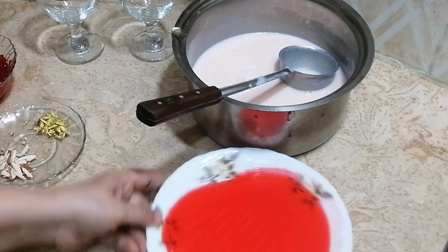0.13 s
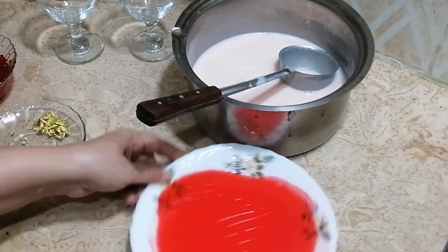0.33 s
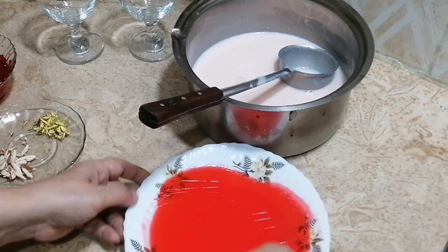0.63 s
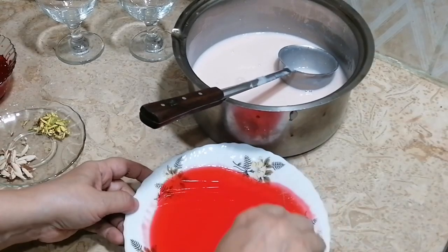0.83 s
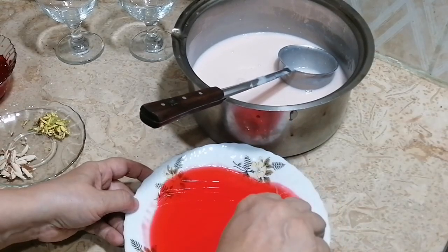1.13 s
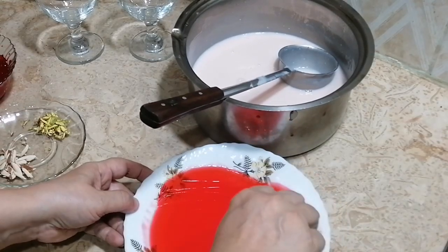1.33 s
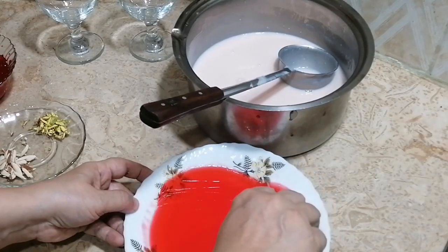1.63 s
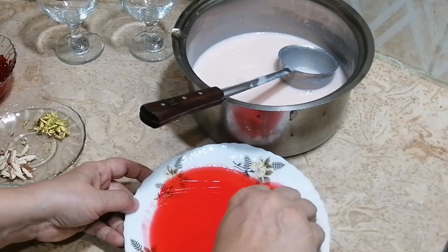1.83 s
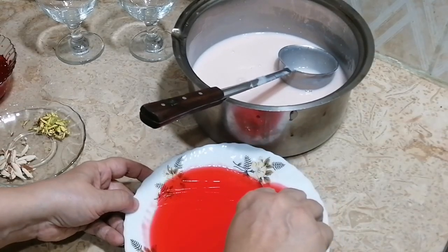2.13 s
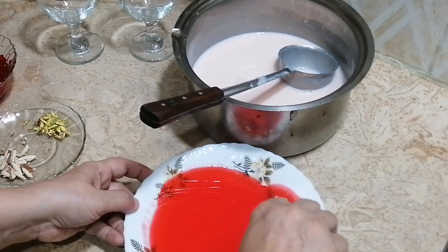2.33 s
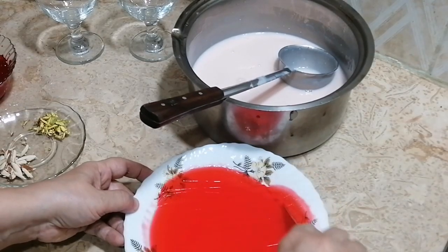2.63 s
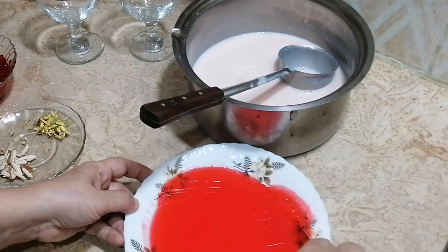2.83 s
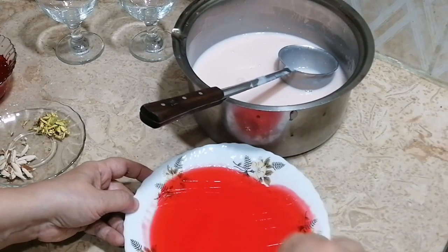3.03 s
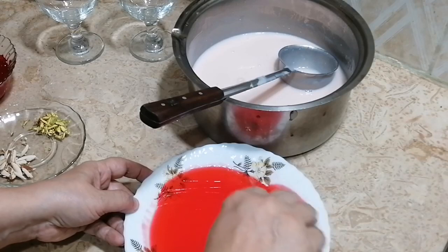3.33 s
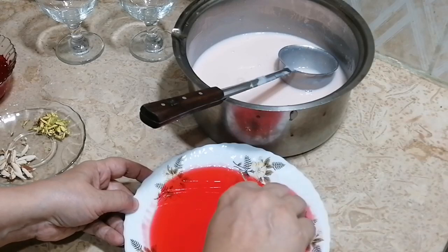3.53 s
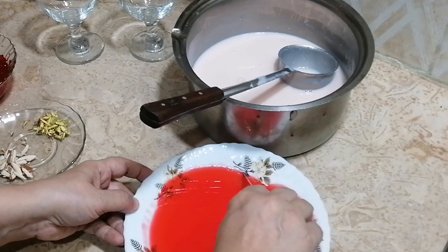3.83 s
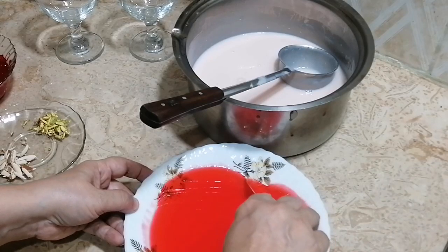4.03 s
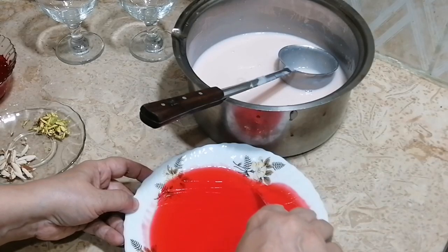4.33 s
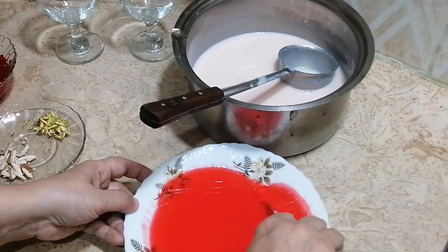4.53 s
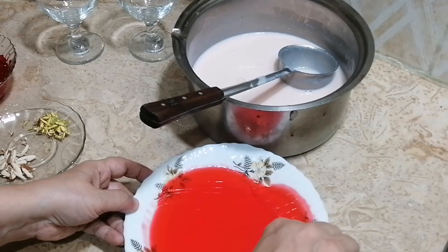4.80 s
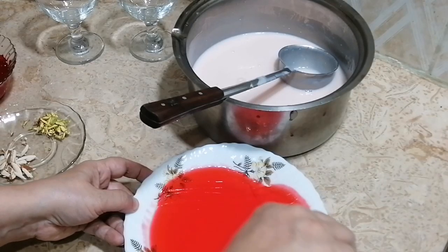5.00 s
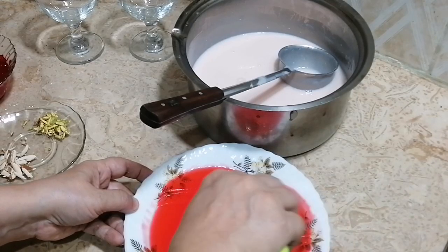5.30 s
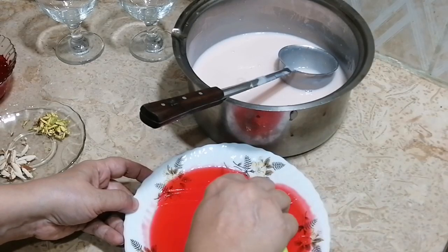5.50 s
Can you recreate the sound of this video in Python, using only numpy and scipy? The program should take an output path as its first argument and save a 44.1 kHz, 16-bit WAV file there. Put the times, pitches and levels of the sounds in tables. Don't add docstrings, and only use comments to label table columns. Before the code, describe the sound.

In a softly humming kitchen, a plate is set down with a bright ringing knock, followed by spaced bursts of sharp blade clicks on glazed ceramic.

```python
import sys
import numpy as np
from scipy import signal
from scipy.fft import rfft, irfft, next_fast_len
from scipy.io import wavfile
from scipy.ndimage import uniform_filter1d, map_coordinates

SR = 44100
rng = np.random.default_rng(int(sys.argv[2]) if len(sys.argv) > 2 else 0)


def inscribe(sig):
    pcm = np.round(np.clip(np.atleast_2d(sig).T, -1, 1) * 32767)
    wavfile.write(sys.argv[1], SR, pcm.astype(np.int16))


def makeup_ratio(level_db):
    decades = np.asarray(level_db, float) / 20
    return 10 ** decades


N = 249606
PADDED = next_fast_len(N + SR)
HZ = np.fft.rfftfreq(PADDED, 1 / SR)
RESPONSE_N, LEAD_N = 2 ** 15, 2 ** 9
RESPONSE_HZ = np.fft.rfftfreq(RESPONSE_N, 1 / SR)
TIME_S = np.arange(N) / SR
EARS = np.array([[.5], [-.5]])
MIC_PHASE_RAD = 1.34
TOUCH_S, LIFT_S, LIFT_DULL = 0.018, 0.2, 1.11
LEAN_S, EASE_S, AWAY_DB = 0.17, 0.24, 51
BRUSH_IN_S, BRUSH_OUT_S = 0.47, 0.45

# time_s, peak_db, brightness_db
DROP_BLOWS = [
    (0.5, -21.5, 5),
    (0.542, -31, 18.5),
]
# time_s, peak_db, brightness_db
NEAR_TAPS = [(3.0057, -23.5, -0.5), (3.0223, -28.5, -6), (3.053, -29, -8)]
RIM_TAPS = [(4.0566, -38, -3), (4.077, -35, -7), (4.0915, -23.5, -1.5), (4.1197, -27, -1),
            (4.157, -30.5, -2), (4.1661, -24.5, -5)]
FAR_TAPS = [(5.012, -37, -7), (5.0156, -30, -14)]
# time_s, peak_db, brightness_db
STRIKE_BLOWS = [(3.9491, -16.5, 3.5), (3.9533, -27, 10.5), (3.957, -30, -7)]
# time_s, peak_db, brightness_db
TICK_BLOWS = [(2.743, -53, 0), (2.889, -54, 0), (2.896, -54, 0), (2.903, -57, 0)]
# time_s, peak_db, brightness_db
JELLY_KNOCKS = [(2.2261, -37.5, -22), (2.484, -54, -12), (2.629, -59, -12)]
# time_s, peak_db, brightness_db
NEAR_CHATTER = [(3.063, -34, -11), (3.085, -29, -6), (3.1012, -25, -6), (3.107, -31, -4), (3.116, -29, -8),
                (3.128, -31, -3), (3.1499, -31.5, -3), (3.157, -30, -6), (3.205, -33, -9),
                (3.2363, -37, -5), (3.2578, -32, 2)]
RIM_CHATTER = [(4.174, -29, -4), (4.1943, -31, -6), (4.202, -32, -7), (4.2183, -26, -9), (4.238, -37, -5),
               (4.247, -38, -5), (4.256, -37, -5), (4.263, -35, -5), (4.2832, -28, -4), (4.298, -30, 4)]
FAR_CHATTER = [(5.084, -39, -3), (5.112, -44, -2), (5.146, -31, 8), (5.153, -30, 4), (5.167, -32, 0),
               (5.1845, -22, -3), (5.2, -23, 2), (5.21, -28, 0)]
# time_s, level_db, brightness_db
DROP_RELEASE = [(.56, -19, 0)]
RIM_RELEASE = [(4.203, -39, 0), (4.3, -33, 0)]

# touch_s, length_s, touch_force_db, lift_force_db, brightness_db
SLIDE_RUB = [(.234, .26, -45.5, -44, 2.7)]
SKID_RUB = [(0.498, 0.11, -21, -38.5, 3)]
NEAR_RUB = [(3.007, 0.011, -36.5, -42, 8.4), (3.022, .015, -42, -51, 5), (3.055, 0.035, -38, -34, 2),
            (3.1, .012, -41, -44, 3.3), (3.117, 0.018, -40.5, -44.5, 6.9), (3.15, 0.011, -35, -45.5, 3.4),
            (3.167, 0.021, -50, -49, 9.5), (3.204, 0.015, -40, -41, 1.6), (3.232, 0.024, -44.5, -41, 6.5)]
STRIKE_RUB = [(3.95, 0.049, -48, -60, 21.6), (4.01, 0.022, -55, -66, 4)]
RIM_RUB = [(4.078, 0.011, -40, -47, 2.5), (4.091, 0.014, -48, -48.5, 7.9), (4.12, .03, -55, -60, 8),
           (4.167, .015, -37, -38.5, 2.3), (4.19, 0.03, -42, -36.5, 2.5), (4.235, 0.033, -48, -49, 5),
           (4.278, 0.039, -50, -45, 6.3)]
FAR_RUB = [(5.004, .008, -44, -45, -3), (5.013, 0.026, -45, -41, 5.5), (5.082, 0.01, -44, -46, 3),
           (5.058, 0.07, -53, -40.5, 7), (5.137, 0.03, -44, -33, 2.5), (5.186, 0.025, -30, -35.5, 2)]
SOFT_RUB = [(5.44, 0.2, -60, -60.5, 2), (5.625, 0.032, -54.5, -47, -4.5)]

# freq_hz, width_hz, level_db
SLIDE_MODES = [(771, 29, 9.5), (1210, 90, 3), (1640, 180, 0), (2860, 80, -8), (4550, 35, -1),
               (5350, 150, -4), (6740, 105, -1), (7600, 64, 0.5), (9160, 130, -13)]
DROP_MODES = [(666, 190, -14), (984, 38, 0), (1143, 30, 3.5), (1922, 12, 7), (2475, 25, 0),
              (3170, 210, -6.5), (3280, 36, -10), (3690, 15, -8), (5260, 200, -6.5), (6300, 62, -28),
              (2740, 51, -3.5), (6670, 26, -16), (8370, 120, -14)]
NEAR_MODES = [(1798, 61, -1), (1250, 134, -27), (2607, 86, 4), (3080, 100, -7), (3850, 70, -9),
              (4240, 89, -17), (4260, 50, -26), (5100, 35, -6.5), (5230, 65, -6.5), (6300, 120, -11),
              (6800, 40, -5.5), (7260, 120, -12.5), (7740, 140, -13), (9150, 130, -20)]
NEAR_END_MODES = [(1836, 90, 0), (1310, 134, -12.5), (2560, 110, 3), (2806, 24, 1.5), (3825, 70, -7.5),
                  (4300, 110, -12.5), (5010, 48, -4), (5400, 30, -2), (5330, 61, -4.5), (6200, 120, -9),
                  (6456, 50, -8), (7160, 110, -10), (7740, 140, -10.5), (9060, 82, -26)]
STRIKE_MODES = [(664, 27, -19), (1340, 24, -35), (1665, 29, 0), (1970, 23, 6), (2200, 62, -9.5),
                (2670, 74, -12), (3827, 30, -12.5), (5120, 82, -18.5), (6060, 99, -26), (6416, 32, -16),
                (7500, 18, -15), (7920, 30, -22), (7750, 29, -31), (8650, 19, -29)]
RIM_MODES = [(640, 17, -12), (1640, 57, 2), (1923, 140, -0.5), (2100, 5.8, -7.5), (3800, 34, -23),
             (5160, 120, -19), (5480, 81, -18.5), (6250, 31, -21), (6360, 120, -19), (7340, 32, -16),
             (7830, 30, -21), (8230, 71, -20.5)]
FAR_MODES = [(1540, 18, -10), (1850, 150, -2.5), (2546, 155, 5), (3860, 44, -6), (1210, 60, -19),
             (4600, 89, -24), (5020, 45, -5), (5230, 30, -7), (6510, 64, -2.5), (7360, 50, -4),
             (8150, 76, -13), (9300, 210, -32), (10000, 220, -26)]
# freq_hz, width_hz, level_db
BITE_MODES = [(1830, 90, 0.5), (2370, 33, -6.5), (2830, 76, -2), (3910, 56, -2.5), (4160, 19, -7),
              (4540, 58, -4), (5010, 42, 2), (5310, 53, 2.5), (6360, 30, 3), (7850, 36, -6.5),
              (8300, 45, -25), (9560, 25, -12)]
# freq_hz, width_hz, level_db
LIFT_MODES = [(1770, 51, -8), (2290, 57, -1), (3820, 39, 5), (4400, 23, -10), (4500, 30, -12),
              (4930, 37, 3), (5630, 36, -10), (6374, 58, 7.5), (7640, 51, -1), (9430, 28, -12),
              (10500, 230, -30)]
# freq_hz, width_hz, level_db
MUFFLED_MODES = [(1420, 55, -7), (1676, 35, 1.5), (2030, 44, -4)]
# freq_hz, width_hz, level_db
DROP_RING_MODES = [(984, 5.5, 2), (1132, 7, -1), (1886, 6.5, 1), (2022, 6, -2), (3090, 11, -5),
                   (2435, 10, -5)]
RIM_RING_MODES = [(1686, 36, -1), (1160, 24, -14), (2200, 370, -11)]
FAR_RING_MODES = [(3840, 12, -14), (5100, 17, 4), (6560, 15, -1)]

# freq_hz, density_db_per_hz
SLIDE_BED = [(240, -15), (400, -3), (527, -15), (738, -7.5), (2220, -15.5), (2840, -19), (3910, -24),
             (5230, -6), (6090, -18), (7440, -12), (15500, -32.5)]
DROP_BED = [(110, -64), (180, -21.5), (277, -10.5), (658, -8), (871, -19), (1150, -7.5), (1470, -13.5),
            (1920, -7.5), (2560, -19), (3200, -4.5), (4250, -16.5), (7140, -8), (14800, -30), (16000, -21)]
NEAR_BED_DB = [(130, -66.5), (220, -2.5), (600, -13), (1000, -27), (1770, -16), (2000, -15), (2450, -7),
               (3900, -19), (5230, -8.5), (6590, -19.5), (11000, -26.5), (14500, -36.5), (15500, -45)]
STRIKE_BED = [(260, -55), (450, -25), (1000, -24), (1630, 3), (1780, -12), (1920, -11), (3040, -26),
              (3740, -36), (7610, -28), (15500, -46.5)]
RIM_BED_DB = [(260, -53), (450, -27), (633, -7), (1020, -34.5), (1180, -7), (1660, -4), (2950, -21),
              (4340, -34), (5260, -30), (7610, -22.5), (15500, -48)]
FAR_BED_DB = [(350, -58), (600, -21), (1030, -26), (1250, -10.5), (2070, -8), (2570, -4), (3240, -11.5),
              (5150, -14.5), (7540, -16), (14900, -29), (15500, -43)]
SOFT_BED_DB = [(530, -30), (900, -10), (1030, -38), (1330, -9), (2470, 1), (3890, -10.5), (7290, -8),
               (12000, -23), (15600, -59), (22000, -120)]
# freq_hz, left_minus_right_db
PLATE_LEAN = [(60, 0), (180, -1), (550, 2.5), (1650, 1), (3500, -1.5), (5500, -3), (8500, 0.5), (13000, -1)]

# freq_hz, width_hz
COUNTER_MODES = [(99, 13), (132, 7), (156, 23.4)]
COUNTER_IDLE_DB = [-65.5, -69, -68.5]
# start_s, length_s, level_db, centre_hz
PUSHES = [(0.312, 0.058, -61, 99), (0.864, 0.089, -48, 110.4), (1.044, 0.032, -56, 132),
          (1.733, 0.25, -60.5, 132), (2.282, 0.04, -60, 99), (3.05, 0.028, -30.5, 160),
          (3.14, 0.03, -47, 160), (3.23, 0.046, -37, 152), (3.37, 0.086, -43, 152),
          (3.903, 0.13, -45.5, 143.3), (4.107, 0.056, -45.5, 132), (4.258, 0.093, -55, 130),
          (4.417, 0.07, -46.5, 120), (4.526, 0.19, -51, 132), (4.853, 0.063, -47, 120),
          (5.33, 0.058, -53, 117.4), (5.546, 0.076, -58, 132)]
# time_s, pitch_hz, level_db
BLADE_SQUEAK = [(2.05, 5250, -84), (2.22, 5230, -83), (2.28, 5800, -79), (2.34, 6180, -83),
                (2.41, 5920, -73), (2.455, 5860, -71), (2.5, 4600, -82)]
# start_s, length_s, pitch_hz, level_db
GLASS_TONES = [(.1, 0.14, 3450, -84), (1.1, 0.055, 772, -68), (2.9, .07, 5010, -83),
               (4.34, 0.049, 3500, -74), (4.44, .11, 3500, -76)]
# start_s, length_s, hollow_db, rustle_db
BRUSHES = [
    (0.954, 0.13, -65, -63),
    (4.743, 0.082, -92, -58.5),
]
CUPPED_HZ = [1256, 1390]
# freq_hz, density_db_per_hz
HUM_SPECTRUM = [(28, -52), (48, -7), (64, -40), (82, -10.5), (136, -2), (171, -4.5), (194, -9.5), (241, -4),
                (323, -4), (371, -15), (411, -6.5), (443, -12.5), (633, -14), (747, -17.5), (1000, -20),
                (1300, -54), (2200, -120)]
# freq_hz, density_db_per_hz
AIR_SPECTRUM = [(590, -34), (1000, -0.5), (1200, -0.5), (1520, -3), (1630, -1), (2390, -6.5), (3140, -6),
                (3810, -13.5), (4260, -14.5), (5050, -8.5), (6340, -8.5), (7020, -5), (10100, -15.5),
                (15000, -18.5)]
# freq_hz, correlation_ratio
EAR_LIKENESS = [(60, 0.64), (150, 1), (380, 0.76), (950, 0.16), (2380, 0.02), (5980, -0.16),
                (15000, -0.022)]
# freq_hz, left_minus_right_db
EAR_TILT = [(60, -9), (150, 1.3), (380, -0.5), (950, -0.5), (2380, 0), (5980, -2.5), (15000, 2)]
# freq_hz, t60_s
ROOM_DECAY = [(300, 0.3), (2000, 0.24), (6000, 0.23), (12000, 0.086)]


def unit(x):
    return x / np.sqrt(np.mean(np.abs(x) ** 2) + 1e-30)


def along(points, hz=HZ):
    f, v = np.transpose(points)
    return np.interp(np.log(hz + 1), np.log(f + 1), v)


def curves(rows, outside=-120):
    s, *cols = np.transpose(rows)
    return [np.interp(TIME_S, s, c, outside, outside) for c in cols]


def wobble(rate_hz):
    return map_coordinates(rng.standard_normal(int(N * rate_hz / SR) + 4), [np.arange(N) * rate_hz / SR])


def swell(s, length, db, end_db, attack, release):
    knots_s = np.cumsum([s - attack, attack, length, release])
    return np.interp(TIME_S, knots_s, [db - 60, db, end_db, end_db - 60], -200, -200)


def filtered(x, response):
    return irfft(rfft(x, PADDED) * response, PADDED)[..., :N]


def mode(hz, width, turn=0, f=HZ):
    return width * (1j * f * np.cos(turn) + hz * np.sin(turn)) / (hz * hz - f * f + 1j * f * width)


def causal(db):
    cepstrum = irfft(np.log(makeup_ratio(db) + 1e-6), RESPONSE_N)
    cepstrum[1:RESPONSE_N // 2] *= 2
    cepstrum[RESPONSE_N // 2 + 1:] = 0
    return np.exp(rfft(cepstrum))


def tail(t60s, seconds):
    hz, t, z = signal.stft(rng.standard_normal((2, int(SR * seconds))), SR, nperseg=128)
    decay = makeup_ratio(-60 * t / along(t60s, hz)[:, None])
    x = signal.istft(z * decay, SR, nperseg=128)[1]
    return rfft(x / np.linalg.norm(x[0]), RESPONSE_N)


def pair(spectrum_db):
    turn = np.arccos(np.clip(along(EAR_LIKENESS), -1, 1)) / 2
    mid, side = filtered(rng.standard_normal((2, N)), makeup_ratio(spectrum_db) * [np.cos(turn), np.sin(turn)])
    return unit(filtered(np.array([mid + side, mid - side]), makeup_ratio(EARS * along(EAR_TILT))))


def kitchen():
    hum_db = along([(18, -3.5), (33, -5.5)] + HUM_SPECTRUM[1:])
    hum = pair(np.where(HZ < 1000, hum_db, -120)) * makeup_ratio(-54 + 0.24 * wobble(3.7))
    air = pair(np.where(HZ >= 1000, along(AIR_SPECTRUM), -120)) * makeup_ratio(-64.5 + 0.7 * wobble(2.5))
    hiss = unit(filtered(rng.standard_normal((2, N)), mode(7140, 280) ** 2)) * makeup_ratio(-76.0)
    return hum + air + hiss


def brush():
    out = 0
    for s, length, hollow_db, rustle_db in BRUSHES:
        sweep = makeup_ratio(swell(s, length, 0, 0, BRUSH_IN_S, BRUSH_OUT_S))
        breeze = rng.standard_normal((2, N)) * makeup_ratio(1.2 * wobble(38.5))
        glide = np.pi / 2 * np.clip((TIME_S - s) / length, 0, 1)
        low, high = (unit(filtered(breeze, mode(hz, 180) ** 2)) for hz in CUPPED_HZ)
        hollow = np.cos(glide) * low + np.sin(glide) * high
        rustle = pair(along([(1500, -4), (3000, -6.5), (9000, -6.5), (15000, -33)]))
        out = out + sweep * (makeup_ratio(hollow_db + 5.5) * hollow + makeup_ratio(rustle_db - 4.0) * rustle)
    return out


def squeak():
    out = 0
    tones = [(*curves(BLADE_SQUEAK), .012, 5)]
    for s, length, hz, db in GLASS_TONES:
        tones.append((hz, swell(s, length, db, db, .05, .05), .004, 4))
    for hz, db, flutter, lift_db in tones:
        phase = 2 * np.pi * np.cumsum(hz * (1 + flutter * wobble(250))) / SR
        level = np.sqrt(2) * makeup_ratio(db + lift_db + 3.4 * wobble(60))
        out = out + level * np.sin(phase + 1.47 * EARS)
    return out


def counter():
    lumps = makeup_ratio(4.3 * wobble(35))
    pushes = [(makeup_ratio(swell(s, length, db, db, LEAN_S, EASE_S)), centre) for s, length, db, centre in PUSHES]
    modes = []
    for (hz, width), idle_db in zip(COUNTER_MODES, COUNTER_IDLE_DB):
        shake = filtered(rng.standard_normal((2, N)) * lumps, mode(hz, width) ** 2)
        envelope = abs(signal.hilbert(shake, PADDED)[:, :N])
        shake = unit(shake / envelope ** 0.61)
        push = sum(p * makeup_ratio(-AWAY_DB * abs(np.log2(hz / centre))) for p, centre in pushes)
        modes.append(shake * (makeup_ratio(idle_db) + push))
    mid, side = sum(modes) * makeup_ratio([[0], [-12]])
    return np.array([mid + side, mid - side]) * makeup_ratio(-2.4 * EARS)


def plate(modes, bed, bed_db, wet_db):
    ring = 0
    for hz, width, db in modes:
        turn = rng.uniform(0, 2 * np.pi)
        turns = np.array([[turn], [turn + MIC_PHASE_RAD * rng.choice([-1, 1])]])
        skirt = mode(hz, 0.46 * hz, 0, RESPONSE_HZ)
        ring = ring + makeup_ratio(db) * mode(hz, width, turns, RESPONSE_HZ) * skirt
    dense = causal(along(bed, RESPONSE_HZ) + bed_db) * tail([(500, 0.053), (9000, 0.026)], .15)
    delay = np.exp(-2j * np.pi * RESPONSE_HZ * .006)
    left, right = (ring + dense) * (1 + makeup_ratio(wet_db) * tail(ROOM_DECAY, .5) * delay)
    alike = np.clip(along(EAR_LIKENESS, RESPONSE_HZ), 0, 1)
    both = np.array([left, alike * left + np.sqrt(1 - alike ** 2) * right])
    both = both * makeup_ratio(EARS * along(PLATE_LEAN, RESPONSE_HZ))
    return np.roll(irfft(both, RESPONSE_N), LEAD_N, axis=1)


def contact(rub, taps, bodies, grain_db, tap_db, touch=TOUCH_S):
    grit = unit(rng.standard_normal(N) * makeup_ratio(grain_db * wobble(300) + 1.1 * wobble(45)))
    force, hard = np.zeros((2, N))
    for s, length, db, end_db, edge_db in rub:
        force += grit * makeup_ratio(swell(s, length, db, end_db, touch, LIFT_S))
        hard += grit * makeup_ratio(edge_db + swell(s, length, db, end_db, touch, LIFT_S / LIFT_DULL))
    for s, db, edge_db in taps:
        force[round(s * SR)] += makeup_ratio(db + tap_db)
        hard[round(s * SR)] += makeup_ratio(db + tap_db + edge_db)
    low = 1 / (1 + (HZ / 3400) ** 6)
    drive = filtered(force, low) + filtered(hard, 1 - low)
    travel_s = [rub[0][0], rub[-1][0] + rub[-1][1] + LIFT_S / 3]
    place = np.interp(TIME_S, travel_s, [0, len(bodies) - 1])
    answers = [plate(*body) for body in bodies]
    scale = np.sqrt(np.mean(np.sum(np.square(answers), axis=2)))
    out = np.zeros((2, N + RESPONSE_N))
    for k, answer in enumerate(answers):
        near = np.flatnonzero(abs(place - k) < 1)
        share = np.cos(np.pi / 2 * (place[near] - k))
        heard = signal.oaconvolve((drive[near] * share)[None], answer / scale, axes=1)
        out[:, near[0]:near[-1] + RESPONSE_N] += heard
    return out[:, LEAD_N:LEAD_N + N]


def plate_set_down():
    silent = [(0, 1, -120, -120, 0)]
    slid = (SLIDE_MODES, SLIDE_BED, 0, -11.5)
    dropped = (DROP_MODES, DROP_BED, -4, -4)
    return (contact(SLIDE_RUB, [(.39, -29, 8.7)], [slid] * 3, 1.8, 0)
            + contact(SKID_RUB, DROP_BLOWS, [dropped] * 3, 3.0, 19.8)
            + contact(silent, DROP_RELEASE, [(DROP_RING_MODES, DROP_BED, -40, -12)], 0, 20.3))


def knife():
    silent = [(0, 1, -120, -120, 0)]
    held_modes = NEAR_MODES[2:] + [(3010, 120, -2.0)]
    held = (held_modes, NEAR_BED_DB, -6, -9)
    near = (NEAR_MODES, NEAR_BED_DB, -3, -9)
    near_end = (NEAR_END_MODES, NEAR_BED_DB, -3, -9)
    struck = (STRIKE_MODES + RIM_RING_MODES[1:2], STRIKE_BED, -3.0, -8.5)
    rim = (RIM_MODES + RIM_RING_MODES[1:], RIM_BED_DB, -5.5, -11)
    freed = (RIM_MODES + RIM_RING_MODES, RIM_BED_DB, -6.5, -11)
    far = (FAR_MODES, FAR_BED_DB, -4, -9)
    bite = (BITE_MODES, FAR_BED_DB, -8, -9)
    lift = (LIFT_MODES + FAR_RING_MODES, FAR_BED_DB, -2.5, -9)
    soft = ([(2420, 440, -19)], SOFT_BED_DB, 0, -5.0)
    muffled = (MUFFLED_MODES, STRIKE_BED, -13, -8)
    tick_bed = [(4000, -9), (5000, -11), (11000, -8.0), (15000, -24)]
    tick = ([(5430, 47, 1), (10350, 130, -14)], tick_bed, -3, -3)
    rim_ring = ([(1680, 4.9, 0)], RIM_BED_DB, -40, -12)
    return (contact([(2.226, 0.036, -73, -63, -12)], JELLY_KNOCKS, [muffled], 2.5, 21.0)
            + contact(silent, TICK_BLOWS, [tick], 0, 21.7)
            + contact(NEAR_RUB, NEAR_TAPS + NEAR_CHATTER, [held, near, near, near_end], 2.1, 18.0)
            + contact(STRIKE_RUB, STRIKE_BLOWS, [struck] * 2, 6.1, 19.3)
            + contact(RIM_RUB, RIM_TAPS + RIM_CHATTER, [rim, freed, freed, freed], 1.9, 18.0)
            + contact(silent, RIM_RELEASE, [rim_ring], 0, 20)
            + contact(FAR_RUB, FAR_TAPS + FAR_CHATTER, [far, far, far, bite, lift], 0.67, 14.0)
            + contact(SOFT_RUB, [], [soft] * 3, 1.7, 0, touch=0.26))


def scene():
    return kitchen() + brush() + squeak() + counter() + plate_set_down() + knife()


def starved(x):
    loud_db, masked_db, starve_hz, roof_hz, spared = -55, -30, 8400, 15100, .25
    hz, _, z = signal.stft(x, SR, nperseg=1024)
    power = uniform_filter1d(np.mean(abs(z) ** 2, axis=0), size=3, axis=1) * 4 / 3
    total = power[hz > 900].sum(axis=0)
    band = (hz // 520).astype(int)
    band_power = np.array([power[band == b].sum(axis=0) for b in range(band[-1] + 1)])
    weak = band_power < total * makeup_ratio(2 * masked_db)
    turns = unit(uniform_filter1d(rng.standard_normal(weak.shape), size=9, axis=1)) > spared
    lost = turns[band] | (hz > roof_hz)[:, None]
    drop = (total > makeup_ratio(2 * loud_db)) & weak[band] & (hz > starve_hz)[:, None] & lost
    return signal.istft(z * ~drop, SR, nperseg=1024)[1][:, :N]


def low_pass(x):
    return signal.sosfilt(signal.butter(12, 15800, fs=SR, output="sos"), x)


def record(dry):
    turn = 2 * np.pi * np.arange(N) / 2048
    ripple = makeup_ratio(-50.5) * (np.sin(turn) + 0.036 * np.sin(2 * turn) + 0.1 * np.sin(3 * turn))
    top_db = along([(14600, -0.94), (15300, 4.0)])
    kept = filtered(dry, makeup_ratio(top_db) * np.where(HZ < 15720, 1, makeup_ratio(-25)))
    power = np.mean(filtered(kept, HZ > 900) ** 2, axis=0)
    level_db = 10 * np.log10(abs(uniform_filter1d(power, size=3000)) + 1e-12)
    duck = makeup_ratio(-.6 * np.clip(level_db + 33.5, 0, 30))
    mix = starved(duck * kept) + duck * ripple - .0002
    return low_pass(mix)


dry = scene()
out = record(dry)
inscribe(out)
```